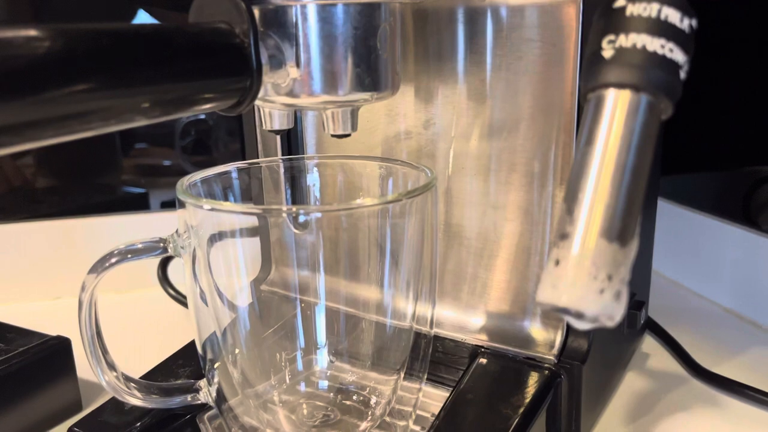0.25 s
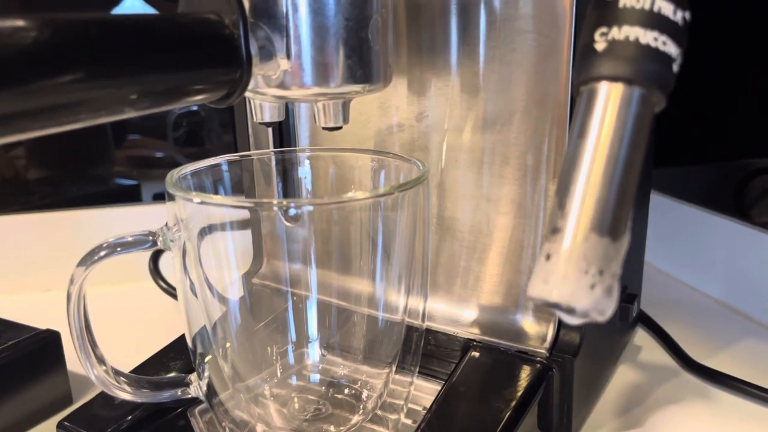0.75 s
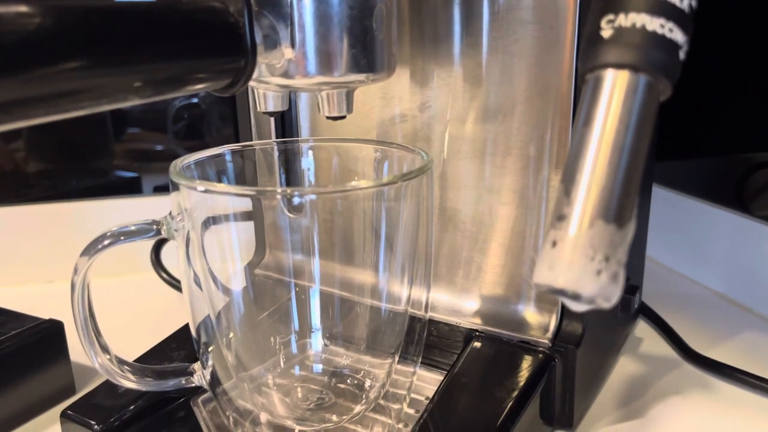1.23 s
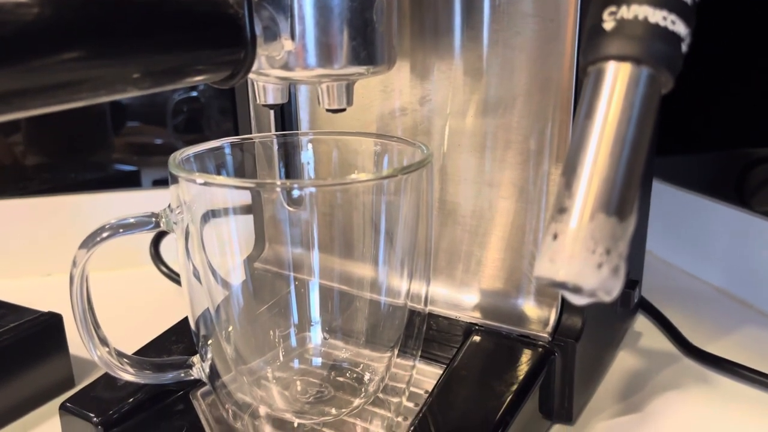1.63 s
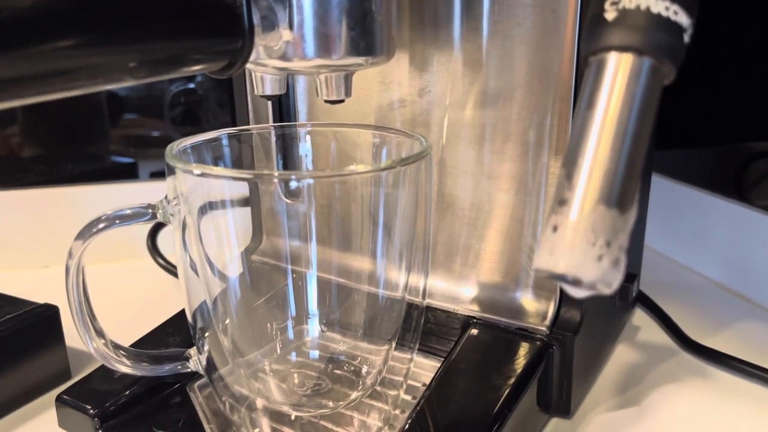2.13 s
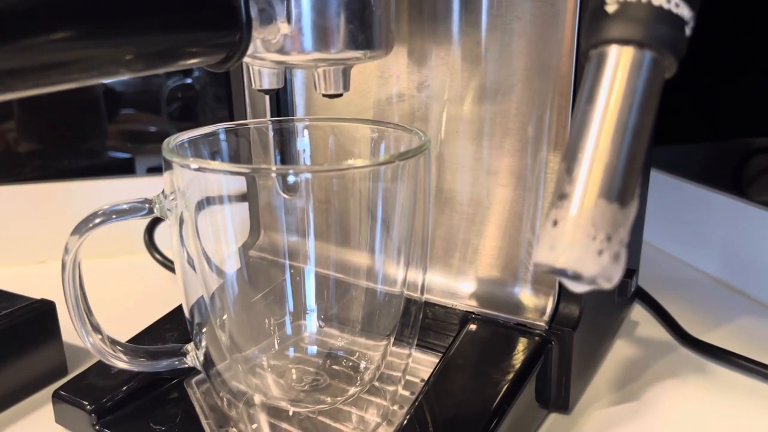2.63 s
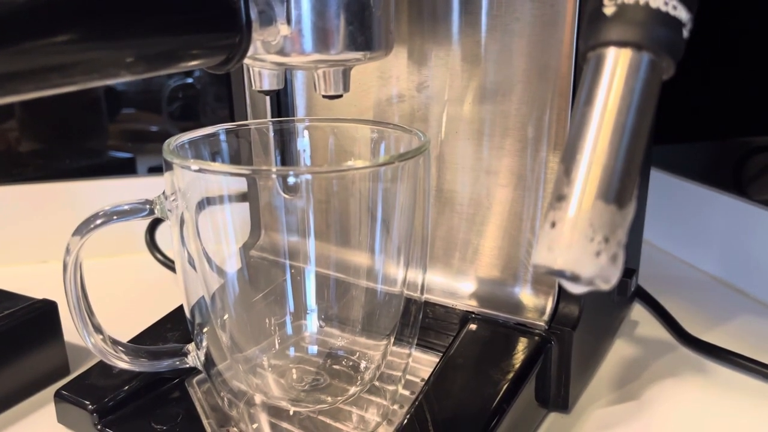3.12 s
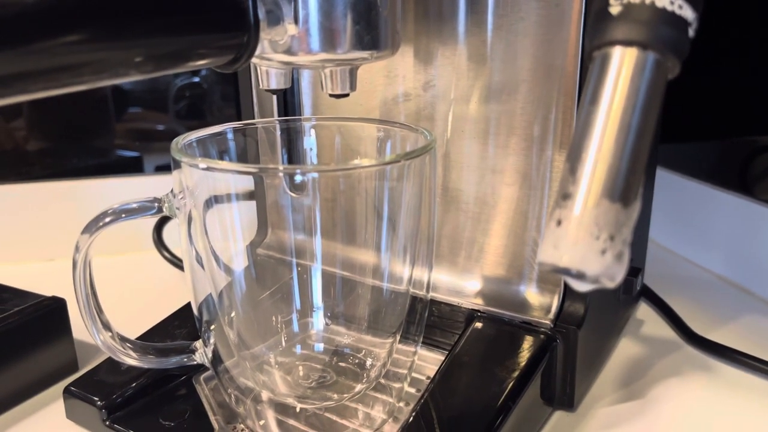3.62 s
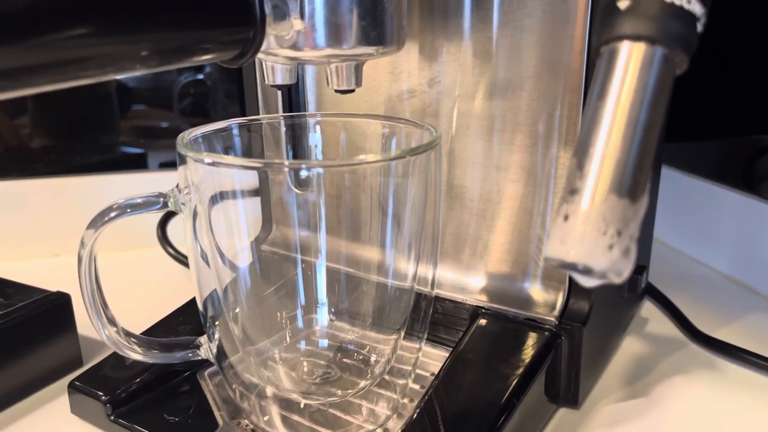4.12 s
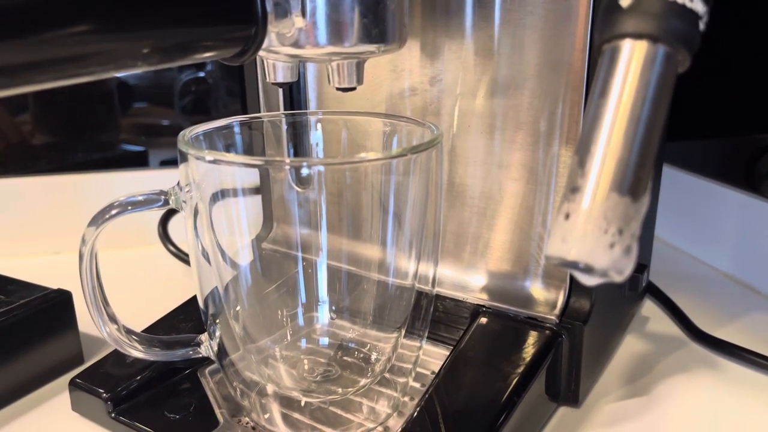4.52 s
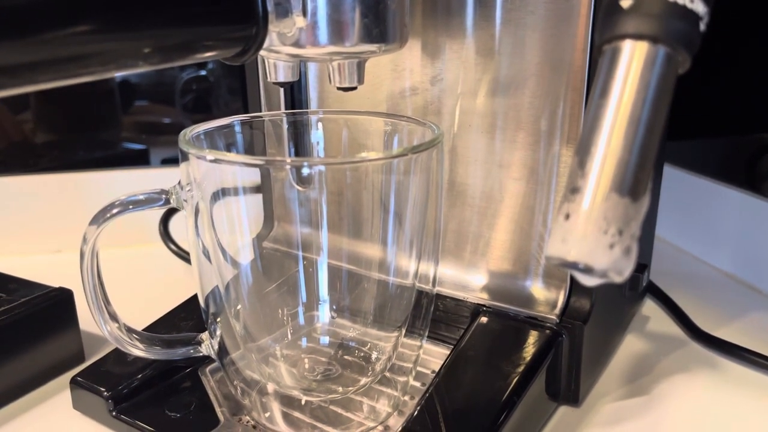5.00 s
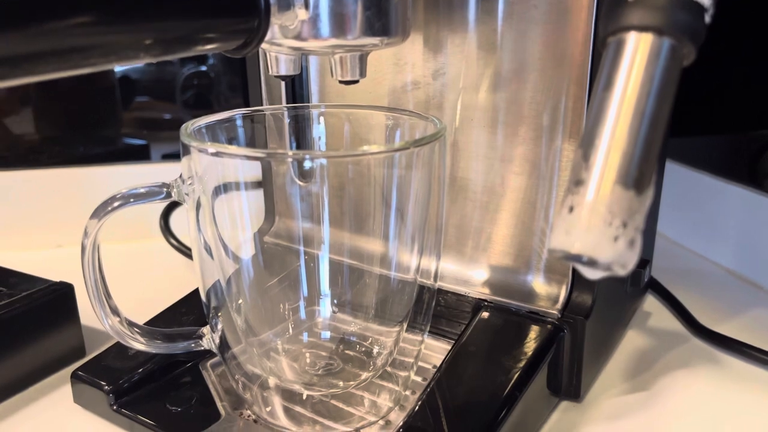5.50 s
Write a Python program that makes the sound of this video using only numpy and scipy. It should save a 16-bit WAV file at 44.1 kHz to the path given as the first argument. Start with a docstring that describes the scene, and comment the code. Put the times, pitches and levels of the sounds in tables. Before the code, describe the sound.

An espresso machine's vibrating pump drones with a low electric buzz and watery hiss, knocking early, then straining, clicking and settling softer.

```python
"""Kitchen counter: a mains-driven vibrating pump pushes water through an espresso machine.
Fifty piston strokes a second hum as steady orders; noise swelling on each stroke buzzes the panels,
rattles loose parts and puffs hiss through the valve. Air pockets knock, mostly early on, as ringing
housing modes; a small part pings, two clicks crack, and the pump settles to a softer load."""
import sys
import numpy as np
from scipy import signal
from scipy.fft import rfft, irfft, next_fast_len
from scipy.io import wavfile
from scipy.ndimage import uniform_filter1d

SR = 44100
rng = np.random.default_rng(int(sys.argv[2]) if len(sys.argv) > 2 else 0)


def pcm_store(signal):
    """Save signal as 16-bit PCM."""
    levels = np.round(np.clip(np.atleast_2d(signal), -1, 1) * 32767)
    wavfile.write(sys.argv[1], SR, levels.astype(np.int16).T)


N = 253575

STROKE_HZ = 50
STEP = 49  # samples between control values


def gain_of(db):
    """Decibels to an amplitude factor."""
    return 10 ** (np.asarray(db) / 20)


def evened(x):
    """Scales to rms 1."""
    return x / np.sqrt(np.mean(x ** 2) + 1e-20)


def read(points, hz):
    """Interpolates a spectrum on a log-frequency axis."""
    point_hz, value = np.transpose(points)
    return np.interp(np.log(hz + 1), np.log(point_hz + 1), value)


def shaped(points):
    """Response that follows a spectrum in dB."""
    return lambda hz: gain_of(read(points, hz))


def ringing(modes, floor_hz=440):
    """Sum of resonances; small panels radiate no bass, so it falls away below floor_hz."""
    def response(hz):
        rings = 0
        for k, (mode_hz, width_hz, db) in enumerate(modes):
            detuning = (hz ** 2 - mode_hz ** 2) / (hz + 1) / width_hz
            rings = rings + (-1) ** k * gain_of(db) / (1 + 1j * detuning)
        return abs(rings) / (1 + (floor_hz / (hz + 1)) ** 12)
    return response


def curve(rows):
    """Interpolates (time, value) rows at the control rate."""
    s, value = np.transpose(rows)
    return np.interp(np.arange(0, N, STEP) / SR, s, value)


# Working states: priming, gulping air, low, middle, high and full pressure, a surge that builds
# and peaks, a stall, settling, settled.
# (from [s], to [s], panel buzz [dB], low panel buzz [dB], rattle [dB], churn [dB], hiss [dB],
#  spray [dB], growl [dB], unsteadiness [dB], fundamental left-right [dB])
STATES = [(0, 0.407, -59, -48, -44.5, -38.5, -46, -55.5, -78, 1, 0),
          (0.513, 0.997, -66, -48, -43.5, -39.5, -46, -55.5, -80, 1, 0.5),
          (1.084, 1.4, -51.5, -59, -45, -40, -45, -52.5, -78, .2, 2.5),
          (1.902, 2.493, -69, -55, -44, -45.5, -44, -53, -79, 0.1, 5),
          (2.764, 3.195, -51, -57, -45, -42.5, -45, -53, -81, 0.1, 5),
          (3.45, 4.032, -51, -56.5, -43.5, -42.5, -45, -54, -77, 0.1, 3.5),
          (4.084, 4.12, -56, -53, -42.5, -42, -46, -50.5, -52, 2.5, 2),
          (4.144, 4.31, -61, -54, -42, -44, -46, -56, -49, -0.2, 2),
          (4.374, 4.418, -51, -62, -49, -43, -46.5, -60, -64, 2.5, 4),
          (4.483, 4.887, -59, -58, -47.5, -46, -47, -62, -76, 0.5, 4),
          (5.2, 5.75, -53.5, -71, -50, -44.5, -47.5, -63, -83, 0, 3)]


def state(values, size=1):
    """One value per working state: held in each state, gliding between."""
    edges_s = np.ravel([row[:2] for row in STATES])
    return np.interp(np.arange(0, N, size) / SR, edges_s, np.repeat(values, 2))


def waver(hz, count):
    """Slow smoothed noise at the control rate, rms about 1."""
    steps = rng.standard_normal((count, int(N / SR * hz * 8) + 2))
    steps = uniform_filter1d(steps, 4, axis=1)
    place = np.linspace(0, steps.shape[1] - 1, len(range(0, N, STEP)))
    return np.array([np.interp(place, np.arange(len(row)), evened(row)) for row in steps])


def strokes(same, start, rise, fall, floor_db, uneven_db):
    """Noise swelling each stroke (times in turns); same (0-1) sets how far it repeats between strokes."""
    length = SR // STROKE_HZ
    fresh = rng.standard_normal((2, N // length + 41, length))
    noise = signal.lfilter([1], [1, -same], fresh, axis=1)[:, 40:]
    turn = (np.arange(length) / length - start) % 1
    swell = (1 - np.exp(-turn / rise)) * np.exp(-turn / fall)
    # no two strokes are equally hard
    chance = np.clip(rng.standard_normal((noise.shape[1], 1)), -2, 2)
    force = gain_of(uneven_db * chance)
    shape = (gain_of(floor_db) + force * swell / swell.max()).ravel()
    return noise.reshape(2, -1)[:, :N] * shape[:N]


# Left-right likeness of broadband sound: (frequency [Hz], likeness [0-1])
ALIKE = [(60, 0.5), (130, 0.75), (400, 0.99), (600, 0.94), (1100, 0.66), (2000, 0.29), (3500, 0.25),
         (5500, 0.55), (6800, 0.22), (8000, 1), (9800, 0.029), (10600, 0.9), (13000, 1), (13800, 0.81),
         (15000, 1)]
# Phase by which left leads in the shared part: (frequency [Hz], lead [rad])
LEAD = [(0, 0), (275, 0), (340, .8), (430, .8), (530, 2.8), (730, 3.3), (860, 4.2), (950, 5.2), (1460, 4.9),
        (2525, 9.4), (3025, 8.8), (4220, 13.6), (5340, 5.9), (5600, 3.1), (6030, 4.1), (7580, -9.4),
        (8870, -9.7), (10400, -12.5), (13300, -12.7), (14400, -15.6), (15300, -15.7)]
# Level balance: (frequency [Hz], left-right [dB])
TILT = [(60, -1), (270, 0), (325, -3), (380, 4), (700, 9), (930, 4.5), (1290, 3), (1800, 5.5), (2500, 2),
        (3000, 7.5), (4400, 12.5), (8120, 0), (15000, -0.5)]


def ports(pair, colour):
    """Colours two unrelated signals and blends them into left and right; their mean has rms 1."""
    size = next_fast_len(pair.shape[1])
    hz = np.fft.rfftfreq(size, 1 / SR)
    left, other = rfft(pair, size)
    alike = np.clip(read(ALIKE, hz), 0, 1)
    tilt = gain_of(read(TILT, hz) / 2)
    right = alike * np.exp(-1j * read(LEAD, hz)) * left + np.sqrt(1 - alike ** 2) * other
    spectrum = np.array([left * tilt, right / tilt]) * colour(hz)
    out = irfft(spectrum, size)[:, :pair.shape[1]]
    return out / np.sqrt(np.mean(out.mean(0) ** 2))


def add(mix, s, sound):
    """Mixes a sound in at time s."""
    part = mix[:, round(s * SR):][:, :sound.shape[1]]
    part += sound[:, :part.shape[1]]


# Fundamental: (time [s], level [dB])
THROB = [(0.06, -24.5), (0.29, -24.5), (0.83, -26.5), (0.87, -24.5), (1.04, -25.5), (1.12, -24.5),
         (3.88, -26.5), (4.22, -23.5), (4.55, -29), (5.68, -27)]
# Higher orders: multiples of the stroke rate
ORDERS_HEARD = [2, 3, 4, 5, 6, 7, 8, 9, 10, 11, 12, 13, 14, 15, 16, 17, 18, 19, 20, 21, 23, 24, 25, 28, 30,
                32, 33, 37, 39]
# One row per state, one column per order heard: (level [dB], ...)
TONES = [(-70, -39, -36.5, -33.0, -31, -50, -45, -49.5, -52, -69, -60, -61, -64.5, -72.0, -60, -57.5, -56, -61, -64, -55, -58, -58, -53, -64, -62, -63, -79, -62.0, -64),
         (-64, -35.0, -48, -34, -33.5, -41, -52, -58, -47, -73, -57, -56, -56, -80, -57, -58, -73, -56, -76, -57, -64, -56, -66, -76, -68, -76, -68, -70, -55.5),
         (-56, -39.5, -33.5, -37.5, -35, -45.5, -46, -65, -51, -63, -69, -55, -59, -70, -77, -48.5, -53, -66, -77.5, -61, -62, -53, -58, -65, -57, -68, -72, -69, -84.5),
         (-49.5, -37.5, -31, -39.5, -35.5, -41.0, -43.5, -56, -53.5, -79, -66, -60, -79, -58.5, -66, -50.5, -67.5, -75, -79, -71, -76, -52.5, -62.5, -64, -64, -62, -58, -70, -80),
         (-49, -38.0, -29.5, -36.5, -37.5, -42.5, -43.5, -58, -59.5, -62, -61, -68, -79, -63, -59, -56, -51.5, -65, -66, -62, -73, -52.5, -54.0, -60, -58, -56, -72, -57, -73),
         (-47, -38.5, -28.5, -36, -40.5, -42, -46, -58, -67, -66, -66, -65, -64, -68, -83, -51, -49, -76, -71, -68, -68, -54.5, -59, -72, -61, -67, -60, -66, -75),
         (-48, -44, -38, -31, -40, -35, -48.0, -49.0, -58, -57.0, -69.0, -46, -66, -64.0, -52, -86, -68, -56, -73.0, -61, -77.0, -71.0, -63, -75, -71, -67.0, -78, -70.0, -47),
         (-49, -39.5, -38, -32, -32, -44, -50, -50, -53, -50, -48, -49, -53, -56, -57, -50, -49, -60, -52, -47, -54, -64, -69.0, -56, -61, -67, -74, -67, -59),
         (-61.0, -42, -38.5, -67, -53, -49, -74.0, -81.0, -55, -104.0, -92.0, -57, -65, -72.0, -66.0, -76, -59, -58, -70, -71, -71, -55, -62, -74, -75, -75, -69, -65, -56),
         (-59, -42, -38, -50, -43.5, -44.5, -66, -78, -58, -61, -64, -55.5, -67, -72, -71, -53, -53.5, -67, -62, -57, -73.0, -49.0, -59, -59, -68, -68, -66, -60.5, -60.5),
         (-58, -43, -40, -45.5, -43, -43.5, -80, -78, -57, -52.5, -75, -55.5, -60.5, -86, -85, -58.5, -70.0, -63, -60, -75, -63, -57.5, -52.5, -65, -65, -67, -68, -74, -59.5)]
# Fundamental, then the orders heard: (left-right [dB], left leads [rad])
SPREAD = [(0.5, 0.53), (-10, 2.3), (-3, 0.7), (4, 0.5), (-0.5, -1.7), (-3.5, 0.42), (-4, 0.85), (10, 1.5),
          (2, 2), (8, 3), (5, 2), (15, 4), (8, 2.5), (10.0, -0.5), (26, -5.5), (15, -3), (16, -2.9),
          (-5, 1.13), (2, -2.5), (-7, 3), (2, 0.5), (0, -1), (2, 0.5), (5, 0.5), (15, -1.5), (5, -3),
          (9, -1), (10, 4), (12, -2.5), (7, 1.9)]
# Pump resonance on its mount, lower under steady pressure, one per state: (frequency [Hz])
MOUNT_HZ = [275, 275, 225, 225, 225, 225, 275, 275, 275, 275, 275]
# Water line resonance, lower in priming and the building and peaking surge, one per state: (frequency [Hz])
LINE_HZ = [325, 425, 425, 425, 425, 425, 325, 325, 425, 425, 425]
# Piston lands late under the surge, then catches up: (time [s], lateness [ms])
SLIP_MS = [(4.07, 0), (4.2, 1.2), (4.275, 1.2), (4.36, 0)]
SLIP_ORDER = 5  # lowest order bent by the slip
RESONANCE_WIDTH_HZ = 9
WAVER_DB_PER_ORDER, WANDER_RAD_PER_ORDER = 0.035, .012
# from PANEL_ORDER up, panels ring from the valve blow
PANEL_ORDER, BLOW_TURN, SCATTER_RAD_X_ORDER = 9, .38, 25


def hum():
    """Piston orders: sines whose level follows the state and whose phase turns at each resonance."""
    turns = 2 * np.pi * np.arange(SR // STROKE_HZ) * STROKE_HZ / SR
    levels_db = [curve(THROB)] + [state(db, size=STEP) for db in np.transpose(TONES)]
    unsteady_db, sway_db = [state(db, size=STEP) for db in np.transpose(STATES)[-2:]]
    mount_hz, line_hz = state(MOUNT_HZ, size=STEP), state(LINE_HZ, size=STEP)
    late_rad = 2 * np.pi * STROKE_HZ * curve(SLIP_MS) / 1000
    shake = waver(6, count=2 * len(SPREAD))
    out = np.zeros((2, N))
    for k, (order, (tilt_db, lead)) in enumerate(zip([1] + ORDERS_HEARD, SPREAD)):
        if k == 0:
            tilt_db = tilt_db + sway_db
        left = gain_of(tilt_db / 2) * np.exp(.5j * lead)
        right = gain_of(-tilt_db / 2) * np.exp(-.5j * lead)

        # above each resonance the housing swings against the piston
        lag = 1.1
        for hz in (mount_hz, line_hz):
            lag = lag + np.arctan2(RESONANCE_WIDTH_HZ, hz - order * STROKE_HZ)
        if order >= PANEL_ORDER:
            scatter = SCATTER_RAD_X_ORDER / order * rng.standard_normal()
            lag = lag + 2 * np.pi * order * BLOW_TURN + scatter
        if order >= SLIP_ORDER:
            lag = lag + order * late_rad

        waver_db = WAVER_DB_PER_ORDER * order + unsteady_db * (k > 0)
        level_db = levels_db[k] + waver_db * shake[2 * k]
        wander = WANDER_RAD_PER_ORDER * order * shake[2 * k + 1]
        # left-right mean has the table level as rms
        swing = np.sqrt(8) / abs(left + right) * gain_of(level_db) * np.exp(1j * (wander - lag))
        cycle = np.resize(np.exp(1j * order * turns), N)
        for side, port in enumerate([left, right]):
            out[side] += np.real(np.repeat(port * swing, STEP)[:N] * cycle)
    return out


# Panel resonances: (frequency [Hz], width [Hz], relative level [dB])
PANELS = [(950, 82, -4), (1180, 17, -5), (1540, 200, -6), (1910, 59, -8.5), (2390, 32, -6)]
# Low housing resonances: (frequency [Hz], width [Hz], relative level [dB])
LOW_PANELS = [(480, 70, 3.5), (665, 110, -9), (762, 60, -14.5)]


def buzz(panel_db, low_db):
    """Nearly repeating stroke blows excite the panel and low housing resonances."""
    blows = strokes(same=.98, start=.25, rise=.05, fall=.18, floor_db=-8, uneven_db=.8)
    high = gain_of(panel_db) * ports(blows, ringing(PANELS))
    return high + gain_of(low_db) * ports(blows, ringing(LOW_PANELS))


# Loose parts: (frequency [Hz], relative density [dB per Hz])
RATTLE = [(400, -7), (700, -12), (850, -1), (925, 4.5), (1000, -5), (1100, -9), (1220, 4), (1330, -9.5),
          (1425, 0.5), (1500, -0.5), (1700, -3), (1920, -1), (2030, -6.5), (2300, -4.5), (3200, -25.5)]
# Valve seating: (frequency [Hz], relative density [dB per Hz])
TAP = [(1100, -47), (1450, 3), (1650, 3), (1900, -2), (2500, -19)]
TAP_DB = -9  # re rattle


def rattle(level_db):
    """Loose parts shake as noise on each stroke; the valve seats with a short tap once a stroke."""
    loose = strokes(same=.05, start=.26, rise=.08, fall=.35, floor_db=4, uneven_db=1.5)
    seat = strokes(same=.93, start=.36, rise=.02, fall=.07, floor_db=-24, uneven_db=1.2)
    parts = gain_of(level_db) * ports(loose, shaped(RATTLE))
    return parts + gain_of(level_db + TAP_DB) * ports(seat, shaped(TAP))


# Labouring pump: (frequency [Hz], relative density [dB per Hz])
GROWL = [(350, 2), (600, 16), (750, 13), (1000, 8), (1300, -8), (1500, -17), (2000, 19), (2500, -14)]


def growl(level_db):
    """The labouring pump growls: uneven, partly repeating stroke noise."""
    labour = strokes(same=.3, start=.4, rise=.03, fall=.18, floor_db=-10, uneven_db=1.5)
    return gain_of(level_db) * ports(labour, shaped(GROWL))


# Churning water, ringing the housing: (frequency [Hz], relative density [dB per Hz])
RUMBLE = [(60, -4), (140, -4), (225, 1.5), (275, 1.5), (305, -2), (327, 9.5), (350, 0.5), (380, -6.5),
          (425, -6), (475, -10.5), (505, -6), (525, 4.5), (548, -7), (580, -6.5), (800, -32.5)]
# Water through the valve: (frequency [Hz], relative density [dB per Hz])
HISS = [(1200, 6.5), (2200, -6.5), (2800, -26.5), (3600, -2.5), (4050, -7.5), (4500, -2), (5700, -1),
        (6500, -10), (7800, -14.5), (9000, -48)]
# Valve jet: (frequency [Hz], relative density [dB per Hz])
FIZZ = [(6500, -54), (8200, 5.5), (10500, 3), (12700, -3), (14300, -7), (14900, 6), (15700, -15)]
# Coarse spray in the valve: (frequency [Hz], relative density [dB per Hz])
SPRAY = [(1700, -16.5), (2300, 2.5), (2900, 2), (3400, -3), (4200, -23.5)]
FIZZ_DB = -12.5  # re hiss
FLOW_WAVER_DB, JET_SWING_DB, JET_PEAK_TURN = 1.06, 2.0, .3


def water(churn_db, hiss_db, spray_db):
    """Churning rumble plus stroke puffs of turbulent hiss, fizz and spray through the valve."""
    churn = strokes(same=0, start=.54, rise=.14, fall=.37, floor_db=3, uneven_db=3.5)
    rumble = gain_of(churn_db) * ports(churn, shaped(RUMBLE))
    puffs = strokes(same=.03, start=.11, rise=.08, fall=.35, floor_db=-1, uneven_db=2)
    flow = np.repeat(waver(7, count=1)[0], STEP)[:N]
    puffs = puffs * gain_of(FLOW_WAVER_DB * flow)
    turn = STROKE_HZ * np.arange(N) / SR
    jets = puffs * gain_of(JET_SWING_DB * np.cos(2 * np.pi * (turn - JET_PEAK_TURN)))
    hiss = ports(puffs, shaped(HISS)) + gain_of(FIZZ_DB) * ports(jets, shaped(FIZZ))
    spray = gain_of(spray_db) * ports(puffs, shaped(SPRAY))
    return rumble + gain_of(hiss_db) * hiss + spray


# Small air pockets come at random and thin out
GURGLE_START_PER_S, GURGLE_THINNING_S, GURGLE_T60_S = 5, .9, 0.09
GURGLE_DB, GURGLE_SPREAD_DB, GURGLE_HZ = -35, 3, (230, 500)


def gurgles(count=60):
    """Knock rows at random times, their rate decaying exponentially."""
    wait, size, pitch = rng.random((count, 3)).T
    passed = np.cumsum(-np.log(wait + 1e-9)) / (GURGLE_START_PER_S * GURGLE_THINNING_S)
    # no random knocks after the first 85 % of the expected count
    s = -GURGLE_THINNING_S * np.log(1 - passed[passed < .85])
    db = GURGLE_DB + GURGLE_SPREAD_DB * (2 * size - 1)
    hz = GURGLE_HZ[0] * (GURGLE_HZ[1] / GURGLE_HZ[0]) ** pitch
    return [(a, b, f, GURGLE_T60_S) for a, b, f in zip(s, db, hz)]


# Air pockets knocking: (time [s], level [dB], centre of the blow [Hz], t60 [s])
KNOCKS = [(0.106, -21, 270, 0.1), (.202, -22, 560, 0.084), (.275, -22, 220, 0.12),
          (.366, -21.5, 437, 0.097), (.37, -24, 950, 0.044), (.42, -25, 330, .09), (0.533, -22, 240, 0.092),
          (.73, -22.5, 250, .13), (0.826, -24, 330, .07), (.872, -17, 292, 0.11), (0.999, -22, 270, .07),
          (1.13, -20.5, 330, 0.096), (1.162, -22, 320, .09), (1.29, -23, 220, 0.12), (1.385, -21, 280, 0.1),
          (1.531, -17.5, 310, 0.087), (1.64, -21.5, 230, .1), (1.73, -23.5, 340, 0.081),
          (1.9, -20, 290, .1), (1.965, -34, 930, .1), (4.03, -31, 910, 0.15), (4.278, -28, 800, 0.062),
          (4.344, -30.5, 910, 0.11)]
# Modes of the water-filled housing: (frequency [Hz], relative level [dB])
HOUSING = [(193, -7), (232, -1.5), (288, -14.5), (330, -0.5), (388, -2.5), (458, -2), (520, -2), (700, -4),
           (860, -1), (925, -5), (1045, -9)]
BLOW_OCTAVES = .45  # reach of a blow around its centre


def knocks():
    """Each air pocket gives a dull blow that rings the housing modes near its centre."""
    out, t = np.zeros((2, N)), np.arange(6000) / SR
    modes_hz, modes_db = np.transpose(HOUSING)
    for s, db, hz, t60 in KNOCKS + gurgles():
        octaves = np.log2(modes_hz / hz)
        height = gain_of(modes_db) * np.exp(-.5 * (octaves / BLOW_OCTAVES) ** 2)
        start_turn = .3 * rng.random(len(modes_hz))  # struck nearly in phase
        modes = np.sin(2 * np.pi * (modes_hz[:, None] * t + start_turn[:, None]))
        ring = height @ modes / np.linalg.norm(height)
        envelope = gain_of(db - 60 * t / t60) * (1 - np.exp(-t / 0.005))
        add(out, s, envelope * ring * gain_of([[2.0], [-2.0]]))
    return out


# Small metal part: (time [s], level [dB], pitch [Hz])
PINGS = [(3.884, -28, 1890), (4.004, -28, 1890), (4.024, -25, 1873), (4.044, -32, 1890),
         (5.069, -33.5, 1780)]
PING_T60_S = .04


def pings():
    """A small metal part rings: one short decaying sine each."""
    out, t = np.zeros((2, N)), np.arange(3000) / SR
    for s, db, hz in PINGS:
        envelope = gain_of(db - 60 * t / PING_T60_S) * (1 - np.exp(-t / 0.0018))
        add(out, s, envelope * np.sin(2 * np.pi * hz * t) * gain_of([[2.0], [-2.0]]))
    return out


# Clicks: (time [s], peak of left-right mean [dB], t60 [s])
CLICKS = [(4.264, -21.5, 0.035), (4.344, -31, 0.03)]


def clicks():
    """Short broadband cracks: decaying coloured noise."""
    out, t = np.zeros((2, N)), np.arange(3000) / SR
    # (frequency [Hz], relative density [dB per Hz])
    colour = shaped([(300, 7), (800, 13), (1500, -3.0), (3000, -5.5),
                     (7000, -11), (12500, -7.5), (15500, -8)])
    for s, db, t60 in CLICKS:
        envelope = gain_of(-60 * t / t60) * (1 - np.exp(-t / 0.0048))
        crack = ports(rng.standard_normal((2, len(t))) * envelope, colour)
        add(out, s, gain_of(db) * crack / abs(crack.mean(0)).max())
    return out


# Low murmur: (frequency [Hz], relative density [dB per Hz])
KITCHEN = [(22, -36), (34, -6), (60, 4), (95, 8.5), (125, 0.5), (200, -32)]
KITCHEN_DB = -45.5


def room():
    """Steady low murmur of the kitchen: coloured noise."""
    return gain_of(KITCHEN_DB) * ports(rng.standard_normal((2, N)), shaped(KITCHEN))


def scene():
    """Sums the pump, its water, the knocks, pings and clicks, and the room."""
    levels = [state(db) for db in np.transpose(STATES)[2:-2]]
    panel_db, low_db, rattle_db, churn_db, hiss_db, spray_db, growl_db = levels
    pump = hum() + buzz(panel_db, low_db) + rattle(rattle_db) + growl(growl_db)
    return pump + water(churn_db, hiss_db, spray_db) + knocks() + pings() + clicks() + room()


EDGE_HZ = 15700


def record(dry):
    """Band limit: linear-phase low-pass at EDGE_HZ."""
    lowpass = signal.firwin(511, EDGE_HZ, window=("kaiser", 9), fs=SR)
    return signal.oaconvolve(dry, lowpass[None], "same")


dry = scene()
out = record(dry)
pcm_store(out)
```